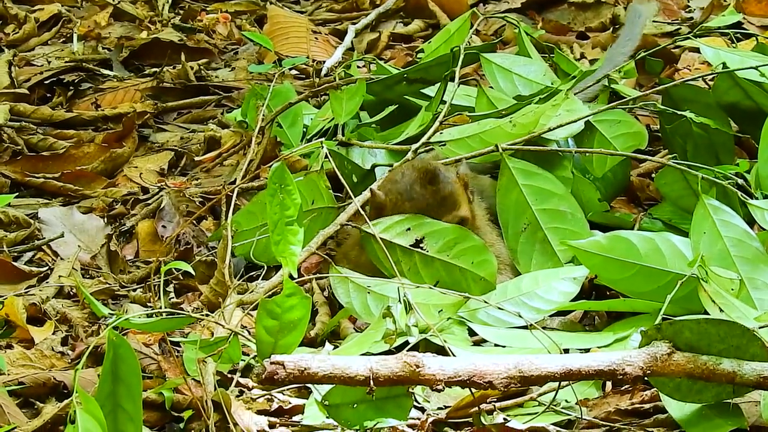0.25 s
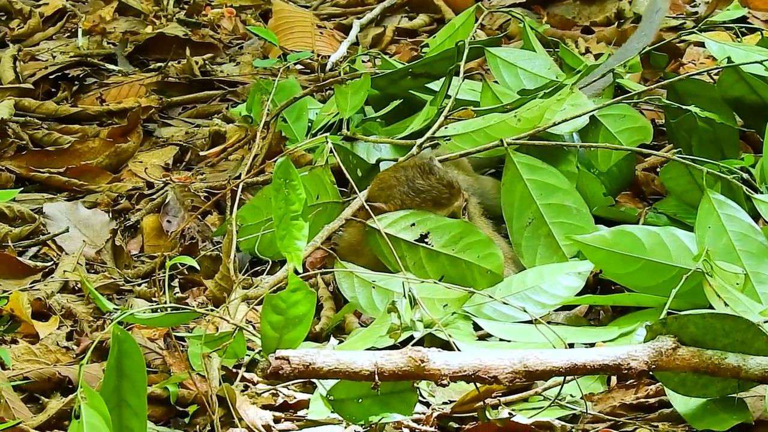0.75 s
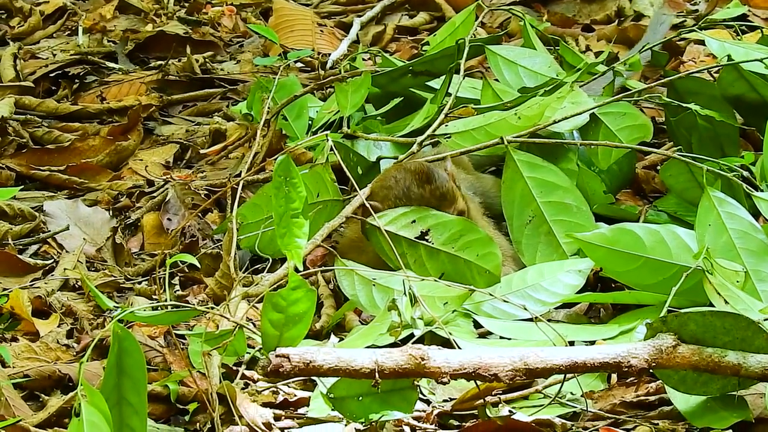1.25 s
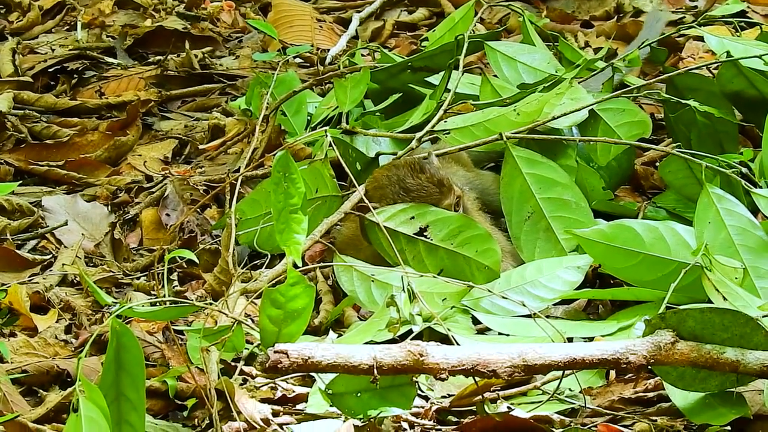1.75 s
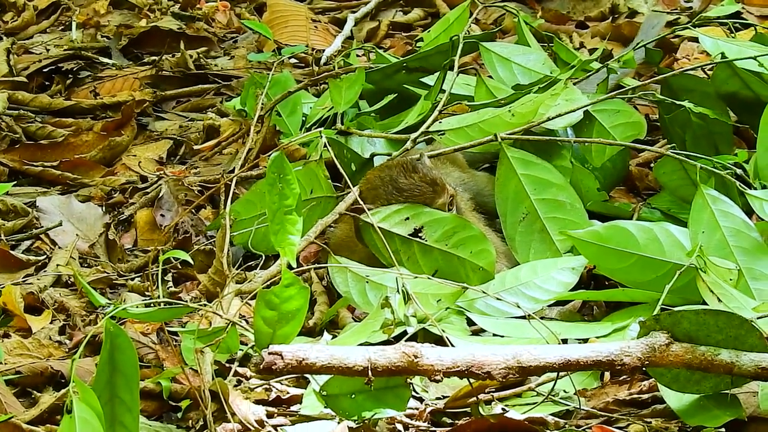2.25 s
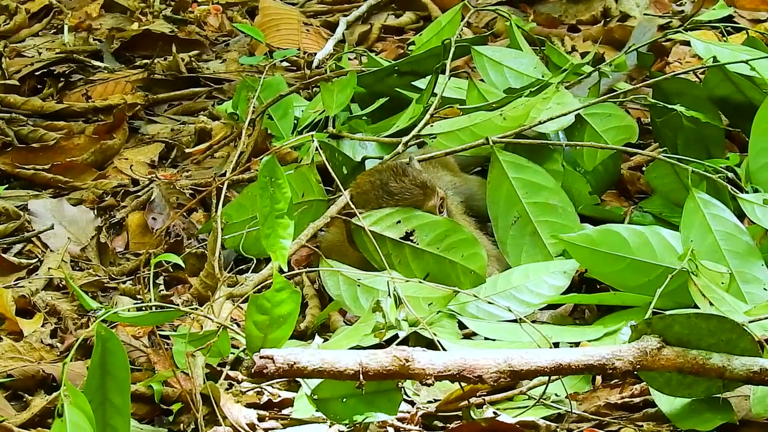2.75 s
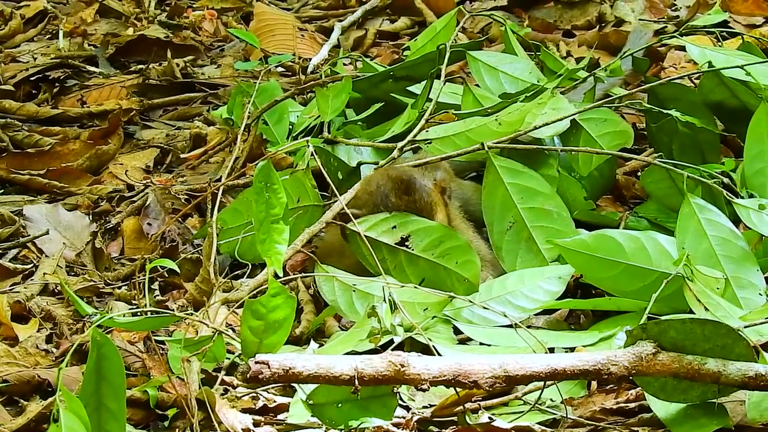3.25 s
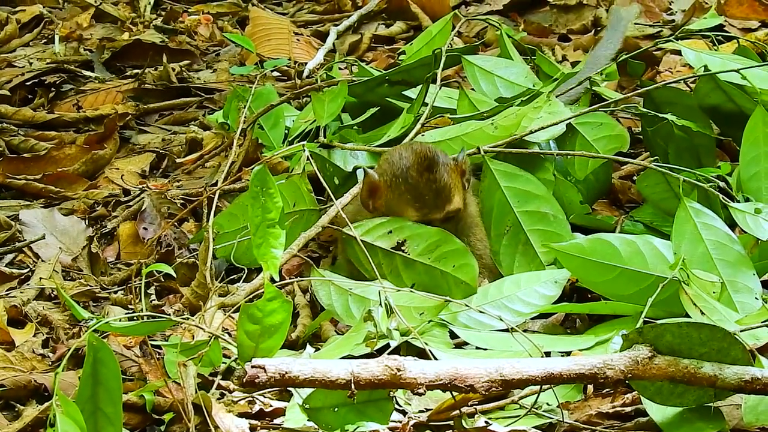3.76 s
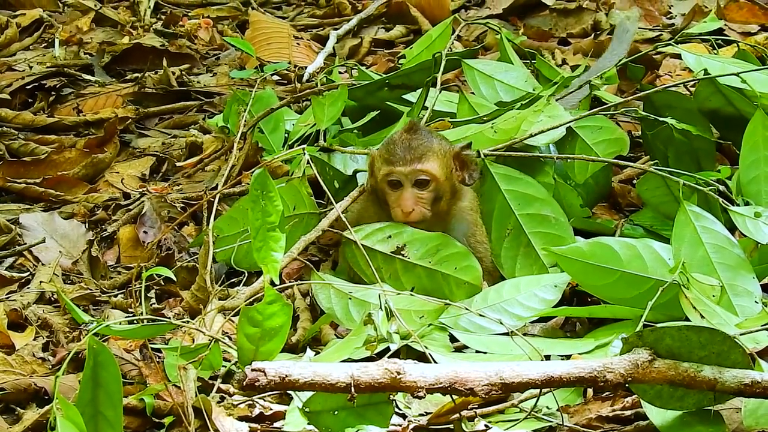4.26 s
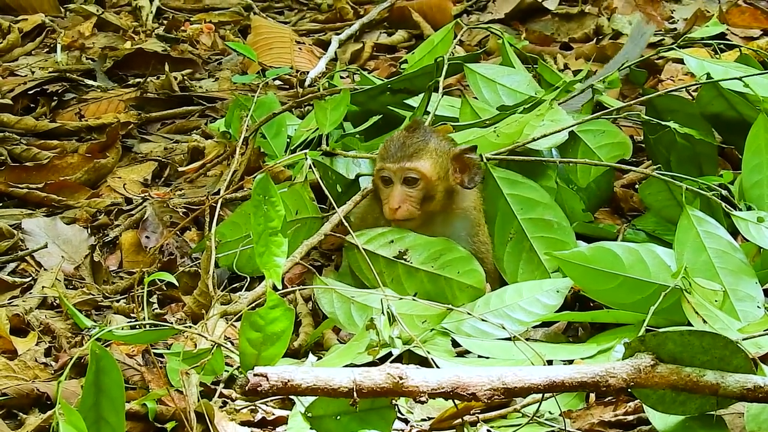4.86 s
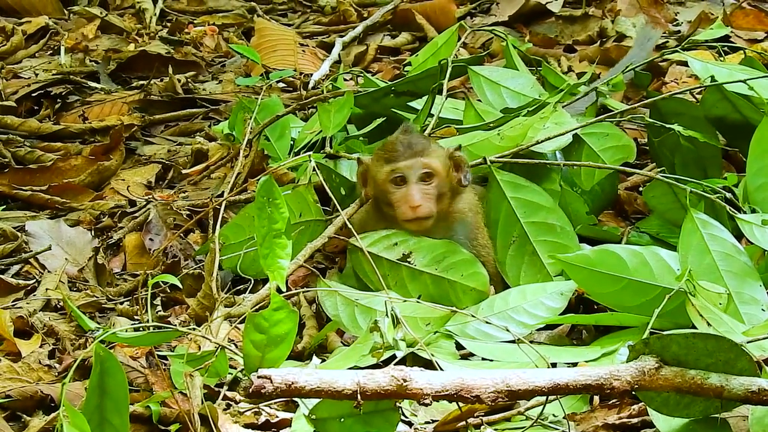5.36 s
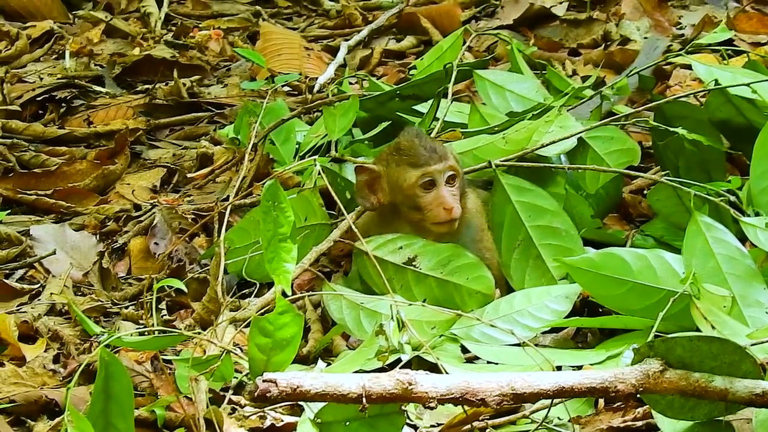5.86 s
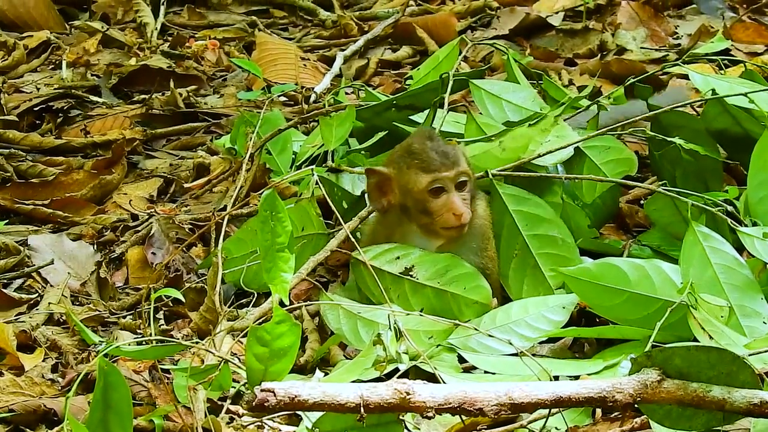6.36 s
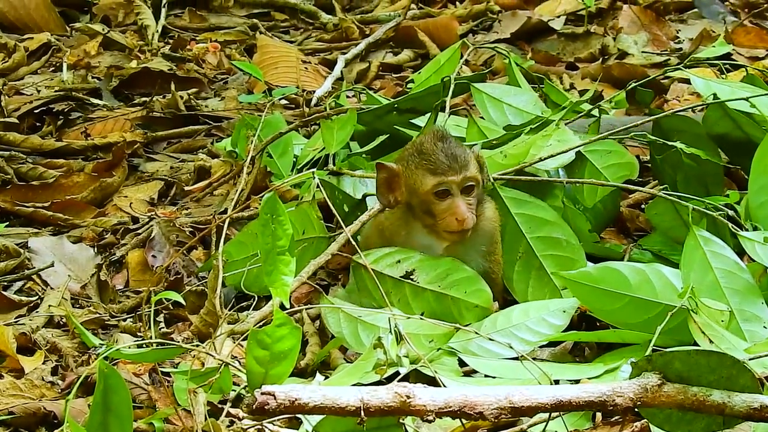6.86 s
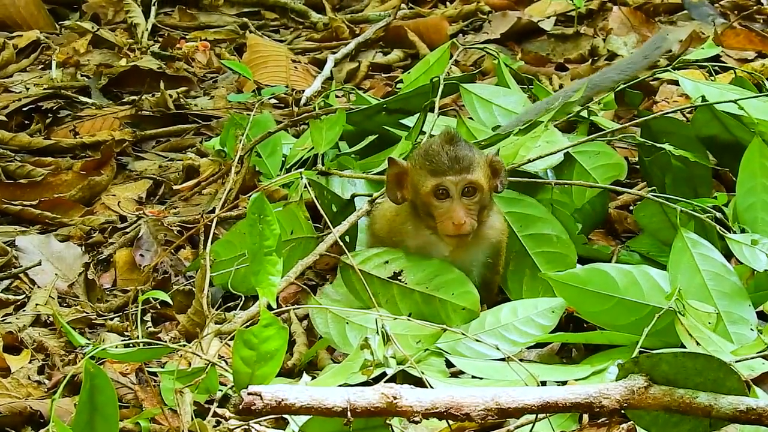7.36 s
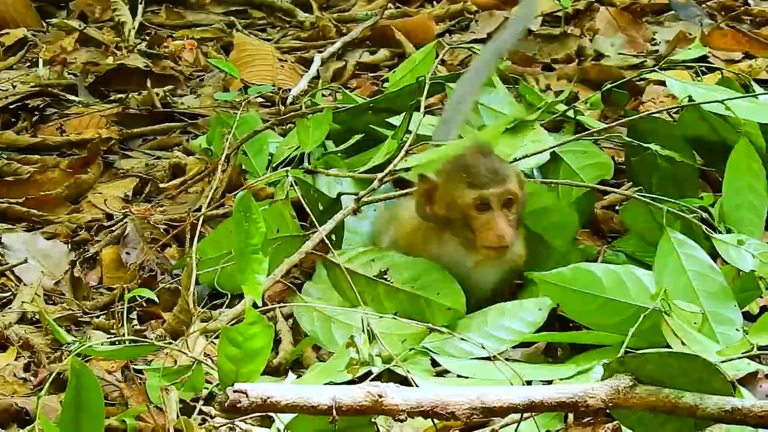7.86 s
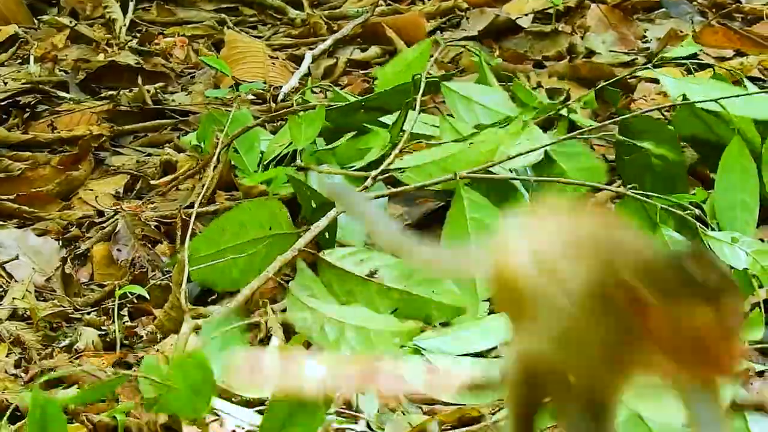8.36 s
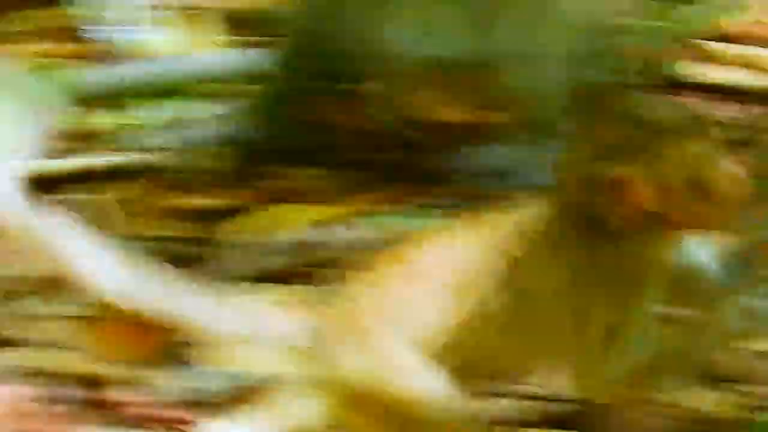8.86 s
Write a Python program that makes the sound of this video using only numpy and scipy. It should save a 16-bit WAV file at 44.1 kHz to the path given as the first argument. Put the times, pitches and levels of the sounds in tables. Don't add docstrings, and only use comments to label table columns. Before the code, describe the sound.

Forest insects whine and pulse above faint engine and traffic rumble, with one loud stick snap late on, followed by busy leaf crunching.

```python
import sys
import numpy as np
from scipy import signal
from scipy.io import wavfile
from scipy.ndimage import uniform_filter1d

SR = 44100
rng = np.random.default_rng(int(sys.argv[2]) if len(sys.argv) > 2 else 0)


def invert_db(x):
    u = np.asarray(x, float) / 20
    return 10 ** u


def digitize_waveform(pressure):
    field = np.atleast_2d(pressure).T
    bounded = np.clip(field, -1, 1)
    quanta = np.round(bounded * 32767).astype(np.int16)
    wavfile.write(sys.argv[1], SR, quanta)


N = 402174

# [t/s, f/Hz, level/dB]
CICADA_NOTE = [(0, 7600, -59.5), (.8, 7520, -61), (1.4, 7510, -62), (2.1, 7656, -63), (2.6, 7674, -62.5),
               (3.2, 7580, -62), (4.2, 7620, -62), (4.8, 7610, -62), (5.4, 7604, -61), (5.9, 7657, -62),
               (6.35, 7684, -61), (6.8, 7660, -62), (7.5, 7695, -63.5), (8, 7750, -61.5), (8.8, 7650, -64),
               (9.12, 7540, -62)]
# [t/s, height/Hz, rise/s]
CICADA_KICKS = [(1.478, 335, .01), (1.81, 325, .01), (2.228, 275, .01), (2.612, 385, .06),
                (4.238, 290, .01), (5.46, 315, .01), (5.85, 275, .01), (6.375, 270, .05), (6.835, 215, .05),
                (7.53, 280, .05), (8.88, 220, .04)]
# [t/s, f/Hz, level/dB]
FAR_CICADA = [(0, 7590, -68), (1, 7500, -77), (2.5, 7480, -72.5), (4.5, 7496, -77), (6, 7470, -76),
              (9.12, 7530, -72)]
VIBRATO_HZ, VIBRATO_DEPTH_HZ = 11.5, 55
COMPANION_DB = -8
SETTLE_S, SETTLE_PER_RISE = .027, 2.3

# [t/s, peak level/dB, body level/dB, crisp f/Hz, body f/Hz]
TWIG_CRACKS = [(.7778, -32, -9, 5540, 2100), (.778, -36, -5, 3600, 1100), (7.1885, -24, -37, 7740, 3800),
               (7.1935, -21, 9, 7400, 3630), (7.1942, -14, -23, 7000, 1540), (7.198, -13, -18, 6800, 1460),
               (7.2031, -18, -17, 5600, 1510), (7.2195, -35, -36, 7560, 3400),
               (7.2347, -14, -47, 6500, 3400), (8.81, -38.5, -14, 5000, 3000), (8.845, -36, 4, 5530, 2350),
               (8.9084, -35.5, -6, 7100, 1010), (8.9128, -35.5, -3, 5230, 1400)]
CRACK_T60_S = 0.017
# [t/s, peak level/dB, t60/s]
LITTER_SETTLING = [
    (0.784, -47.5, .48),
    (7.243, -48, 0.22),
    (7.27, -43.5, 0.1),
]
SETTLING_BODY_DB, SETTLING_HZ, SETTLING_BODY_HZ = -5.5, 5840, 3200
# [t/s, peak level/dB, body level/dB, body f/Hz]
LEAF_TICKS = [(.51, -56, -14, 2500), (1.93, -60, -10, 2500), (2.23, -56, -16, 2500),
              (5.119, -52, -18, 2500), (5.345, -55, 10, 3250), (5.373, -52.5, 13, 2900),
              (5.507, -51, -11, 2500), (5.65, -52, -17, 2500), (6.2037, -48, 0, 3200),
              (6.496, -47, 1, 1510), (6.885, -52, 7, 1500), (7.884, -55, 3, 1840), (8.039, -45.5, -6, 1500),
              (8.161, -49, -6, 1990), (8.35, -50, -4, 3500), (8.3994, -47.5, -5, 2010),
              (8.481, -43.5, -6, 1300), (8.539, -52, 1, 2530), (8.58, -44, 0, 3400), (8.645, -52, -8, 1500),
              (8.6665, -41, -3, 1825), (8.739, -57, 7, 2000), (8.824, -44, 3, 1590), (9.04, -45, 8, 2490),
              (9.072, -46, -8, 2000)]
TICK_HZ, TICK_T60_S = 6500, 0.034
# [t/s, length/s, rms level/dB, body level/dB, crisp f/Hz]
STICK_TEARS = [
    (7.189, 0.018, -28.5, -6.5, 6500),
    (7.214, 0.025, -26.5, -28, 7400),
]
TEAR_BODY_HZ = 3400
# [t/s, length/s, rms level/dB, body level/dB, body f/Hz]
LEAF_CRUSHES = [(2.999, .41, -81, 9, 2980), (3.949, .23, -79, 6.5, 3570), (4.245, .41, -83, 10, 2960),
                (5.858, 0.097, -64, -10.5, 1500), (6.161, 0.033, -64, 7.5, 1930),
                (6.302, 0.12, -76.5, 16, 600), (6.44, .1, -62.5, 0.5, 1080), (7.758, 0.18, -72, 5, 3300),
                (7.778, 0.2, -64.5, -4, 1810), (8.31, 0.083, -59, -19, 1500),
                (8.434, 0.13, -57, -9.5, 1200), (8.564, .15, -73, 1, 3300),
                (8.782, 0.078, -58.5, -11, 1500), (8.994, 0.078, -52, -5.5, 1120),
                (9.027, 0.03, -64.5, 11, 830)]
CRUSH_HZ = 5670
TWIG_S, TWIG_LENGTH_S, TWIG_DB = 6.1775, 0.026, -47.5
# [f/Hz, width/Hz, level/dB]
TWIG_MODES = [(640, 450, -7), (1160, 370, -5), (2010, 290, 0.5), (3200, 380, -3.5), (4450, 620, -6),
              (6300, 2000, 0.5), (8950, 780, -20)]
# [t/s, level/dB]
RUSTLE_LEVEL = [(4.8, -81), (5.5, -71), (6.1, -68), (6.6, -66), (7, -75), (7.4, -66), (7.7, -74),
                (8.3, -62.5), (9.12, -60.5)]

# [t/s, swells so far]
CHORUS_PACE = [(-.07, 0), (1.66, 7), (3.28, 14), (4.27, 18), (5.19, 22), (5.93, 25), (6.47, 27), (9.16, 38)]
# [f/Hz, width/Hz, level/dB]
CHORUS_MODES = [(4520, 600, 8), (4865, 930, 6.5), (5000, 500, -4)]

# [t/s, length/s, first f/Hz, last f/Hz, level/dB]
HUSKY_NOTES = [
    (0, 0.21, 1940, 1880, -70.5),
    (.875, 0.23, 1710, 1750, -66),
    (1.0, 0.12, 2450, 2500, -73),
    (1.071, 0.17, 2250, 2230, -70),
    (1.13, 0.14, 1720, 1860, -67),
    (1.253, 0.33, 1820, 1760, -73.5),
    (7.427, 0.27, 6660, 6860, -67.5),
]
# [t/s, length/s, first f/Hz, last f/Hz, level/dB]
THIN_NOTES = [
    (.857, 0.66, 9130, 8900, -90),
    (1.694, 0.18, 9100, 9100, -88),
    (1.92, 0.097, 9520, 9500, -87),
    (2.05, .2, 9100, 9100, -84),
    (2.16, .08, 8800, 8860, -88),
    (2.3, .14, 8660, 8720, -84),
    (2.644, .12, 6380, 6300, -69),
]
HUSKY_WIDTH_HZ, THIN_WIDTH_HZ = 200, 46
CRICKET_FIRST_S, CRICKET_EVERY_S, CRICKET_BURST_S = .05, .473, .15
CRICKET_HZ, CRICKET_CLIMB_HZ, CRICKET_WIDTH_HZ = 5870, 28, 230
CRICKET_LEVELS = [-68, -68, -74, -74, -75, -75, -72]

# [t/s, firing f/Hz, level/dB]
ENGINE_FIRING = [(0, 42.8, -82), (1.2, 44.12, -66.5), (2.5, 45.6, -66), (4, 47.05, -63), (5.5, 46.54, -62),
                 (7, 46.34, -62.5), (9.12, 45.86, -65.5)]
# [multiple, level/dB]
FIRING_ORDERS = [(1, -7.5), (2, -1), (3, 3.5), (4, 1), (5, -2), (6, -5)]
# [t/s, drone f/Hz, level/dB]
TRUCK_DRONE = [(0, 106.6, -66), (2.5, 115.6, -59.5), (4, 120.3, -60.5), (5.5, 128.7, -63),
               (7, 138.5, -67.5), (9.12, 142.6, -71)]
DRONE_OCTAVE_DB = -8

# [f/Hz, level/dB per Hz]
AIR_SPECTRUM = [(25, -3), (55, -7.5), (126, -2), (223, -10), (437, -26), (791, -24.5), (1150, -30.5),
                (1800, -32), (3400, -40), (6000, -32.5), (8300, -44), (11800, -51.5), (15800, -61.5)]
# [f/Hz, correlation]
AIR_LIKENESS = [(60, 0.95), (150, 0.97), (380, 0.87), (950, 0.83), (2380, 0.64), (5980, 0.041),
                (15000, 0.065)]
RUMBLE_DB, RUMBLE_RISE_DB_PER_S = -1.5, 0.0947
HUSH_DB, HUSH_RISE_DB_PER_S2 = -0.66, 0.08
CROSS_HZ, LAG_S = 4060, 0.01008


def evened(x):
    return x / np.sqrt(np.mean(x ** 2) + 1e-20)


def read(points, hz):
    f, value = np.transpose(points)
    return np.interp(np.log(hz + 1), np.log(f + 1), value)


def curves(rows, t):
    s, *columns = np.transpose(rows)
    return [np.interp(t, s, c) for c in columns]


def add(mix, s, sound):
    part = mix[..., round(s * SR):][..., :sound.shape[-1]]
    part += sound[..., :part.shape[-1]]


def resonate(x, hz, width):
    turn = np.exp(2j * np.pi * np.cumsum(hz * np.ones(x.shape[-1])) / SR)
    r = np.exp(-np.pi * width / SR)
    smooth = signal.lfilter([(1 - r) ** 2], [1, -2 * r, r * r], x / turn + 1e-18)
    return 2 * (turn * smooth).real


def pair(count, same):
    a, b = rng.standard_normal((count, 2)).T
    same = np.clip(same, 0, 1)
    return np.array([a, same * a + np.sqrt(1 - same ** 2) * b])


def forest(x, t60, start_s):
    t = np.arange(SR) / SR
    tail = pair(SR, 0.13) * invert_db(-60 * t / t60) * (t > start_s)
    tail = tail[:, :round(t60 * SR) + 9]
    return signal.oaconvolve(x, tail / np.linalg.norm(tail[0]), axes=-1)[:, :N]


def cicada():
    t = np.arange(N) / SR
    rest_hz, level_db = curves(CICADA_NOTE, t)
    kick_hz = np.zeros(N)
    for s, height, rise in CICADA_KICKS:
        climb = np.clip((t - s) / rise, 0, 1)
        settle_s = SETTLE_S + SETTLE_PER_RISE * rise
        kick_hz += height * climb * np.exp(-np.maximum(t - s - rise, 0) / settle_s)
    drift = evened(uniform_filter1d(rng.standard_normal(N), 6000))
    vibrato = np.sin(2 * np.pi * np.cumsum(VIBRATO_HZ + 1.5 * drift) / SR)
    waver = VIBRATO_DEPTH_HZ * vibrato + 8.0 * drift
    lead_hz = rest_hz + kick_hz + waver * np.exp(-kick_hz / 120)
    lead = np.sin(2 * np.pi * np.cumsum(lead_hz) / SR)
    companion = invert_db(COMPANION_DB) * np.sin(2 * np.pi * np.cumsum(rest_hz - 5 + waver[::-1]) / SR)
    tone = (invert_db(level_db + 1.0) * (lead + companion))[None]
    heard = .25 * tone + forest(tone, 1., .004)
    far_hz, far_db = curves(FAR_CICADA, t)
    return heard + invert_db(far_db) * evened(resonate(pair(N, 0.35), far_hz, 140))


def leafy(x, body_db, crisp_hz, body_hz):
    crisp = evened(resonate(x, crisp_hz, 2370))
    body = invert_db(body_db) * evened(resonate(x, body_hz, 700 + 0.21 * body_hz))
    return signal.lfilter(*signal.butter(2, 10000, fs=SR), crisp + body)


def snaps(out):
    t = np.arange(6000) / SR
    rows = [(s, db, body_db, CRACK_T60_S, *hz) for s, db, body_db, *hz in TWIG_CRACKS]
    rows += [(s, db, SETTLING_BODY_DB, t60, SETTLING_HZ, SETTLING_BODY_HZ) for s, db, t60 in LITTER_SETTLING]
    rows += [(s, db, body_db, TICK_T60_S, TICK_HZ, hz) for s, db, body_db, hz in LEAF_TICKS]
    for s, db, body_db, t60, *hz in rows:
        burst = leafy(rng.standard_normal(6000), body_db, *hz)
        crack = burst * invert_db(-60 * t / max(t60, .003)) * np.minimum(t / 0.00059, 1)
        add(out, s, invert_db(db + 1.5) * crack / abs(crack).max())


def crushes(out):
    rows = [(*row, TEAR_BODY_HZ) for row in STICK_TEARS]
    rows += [(*row, CRUSH_HZ, hz) for *row, hz in LEAF_CRUSHES]
    for s, length, db, body_db, *hz in rows:
        n = round(length * SR)
        noise = rng.random(n) - .5
        strength_db = -3.0 * np.log(np.repeat(rng.random(n // 24 + 1), 24)[:n] + 0.0083)
        swarm = leafy(noise * invert_db(strength_db), body_db, *hz)
        add(out, s, invert_db(db) * swarm * signal.windows.tukey(n, .5))


def rubbed_twig(out):
    rub = rng.standard_normal(round(TWIG_LENGTH_S * SR))
    twig = sum(invert_db(db) * evened(resonate(rub, hz, width)) for hz, width, db in TWIG_MODES)
    twig = signal.lfilter(*signal.butter(4, 9000, fs=SR), twig)
    add(out, TWIG_S, invert_db(TWIG_DB) * twig * signal.windows.tukey(len(rub), .5))


def rustle():
    grain_db = 3.1 * np.minimum(rng.exponential(1, N // 60 + 1), 4)
    grit = pair(N, 0.58) * invert_db(np.repeat(grain_db, 60)[:N])
    colour = leafy(grit, -6.0, 6350, 3380) + invert_db(-15) * evened(resonate(grit, 1420, 1500))
    return invert_db(curves(RUSTLE_LEVEL, np.arange(N) / SR)[0]) * colour


def leaves():
    out = np.zeros(N)
    snaps(out)
    crushes(out)
    rubbed_twig(out)
    near = out + invert_db(-9.0) * forest(out[None], 0.036, .0002)
    return near + invert_db(-25.5) * forest(out[None], 0.49, 0.0042) + rustle()


def chorus():
    ticks = pair(N, 0.55) * invert_db(2.0 * np.minimum(rng.exponential(1, N), 4))
    beat = 2 * np.pi * curves(CHORUS_PACE, np.arange(N) / SR)[0]
    climb = 1 + .022 * np.sin(beat)
    body = sum(invert_db(db) * evened(resonate(ticks, hz * climb, width)) for hz, width, db in CHORUS_MODES)
    uneven = evened(uniform_filter1d(rng.standard_normal(N), 3000))
    swell_db = 2.7 * (np.tanh(1.5 * np.cos(beat + .15)) - 1) + 1.3 * uneven
    return invert_db(-63.5 + swell_db) * evened(body)


def far_calls():
    calls = [(*row, HUSKY_WIDTH_HZ) for row in HUSKY_NOTES]
    calls += [(*row, THIN_WIDTH_HZ) for row in THIN_NOTES]
    for k, db in enumerate(CRICKET_LEVELS):
        s = CRICKET_FIRST_S + k * CRICKET_EVERY_S
        hz = CRICKET_HZ + k * CRICKET_CLIMB_HZ
        calls.append((s, CRICKET_BURST_S, hz, hz, db, CRICKET_WIDTH_HZ))
    out = np.zeros((1, N))
    for s, length, first_hz, last_hz, db, width in calls:
        n = round(length * SR)
        glide_hz = np.linspace(first_hz, last_hz, n)
        whistle = evened(resonate(rng.standard_normal(n), glide_hz, width))[None]
        add(out, s, invert_db(db) * whistle * signal.windows.tukey(n, .5))
    return 0.74 * out + 0.53 * forest(out, 0.89, 0.0099)


def idling_engine():
    push = rng.standard_normal(N)
    hz, level_db = curves(ENGINE_FIRING, np.arange(N) / SR)
    orders = sum(invert_db(db) * evened(resonate(push, k * hz, 2.4)) for k, db in FIRING_ORDERS)
    return invert_db(level_db) * orders


def far_truck():
    push = rng.standard_normal(N)
    hz, level_db = curves(TRUCK_DRONE, np.arange(N) / SR)
    octave = invert_db(DRONE_OCTAVE_DB) * evened(resonate(push, 2 * hz, 9))
    return invert_db(level_db) * (evened(resonate(push, hz, 3.2)) + octave)


def air():
    frames, hz = N // 512 + 5, np.fft.rfftfreq(2048, 1 / SR)
    a, b, c, d, patches = rng.standard_normal((frames, 1025, 5)).T
    patches = evened(uniform_filter1d(uniform_filter1d(patches, 14, 0), 8, 1))
    t = np.arange(frames) * 512 / SR
    rumble_db = RUMBLE_DB + RUMBLE_RISE_DB_PER_S * t
    hush_db = HUSH_DB + HUSH_RISE_DB_PER_S2 * t ** 2
    low = (1 / (1 + (hz / 380) ** 4))[:, None]
    high = (1 / (1 + (hz / 3500) ** 4))[:, None]
    swell_db = low * rumble_db + (1 - low) * high * hush_db
    same = np.clip(read(AIR_LIKENESS, hz), -1, 1)[:, None]
    left = a + 1j * b
    right = same * left + np.sqrt(1 - same ** 2) * (c + 1j * d)
    level_db = read(AIR_SPECTRUM, hz)[:, None] + 1.47 * patches + swell_db
    z = np.array([left, right]) * invert_db(level_db)
    return invert_db(-50.5) * evened(signal.istft(z, nperseg=2048, noverlap=1536)[1][:, :N])


def scene():
    return cicada() + leaves() + chorus() + far_calls() + idling_engine() + far_truck() + air()


def gate(x, strength):
    z = signal.stft(x, nperseg=2048, noverlap=1536)[2]
    around = uniform_filter1d(abs(z), size=15, axis=1) + 1e-12
    gain = 0.95 * np.clip(abs(z) / around, .05, 2.5) ** strength
    return signal.istft(z * gain, nperseg=2048, noverlap=1536)[1][:, :N]


def low_pass(x):
    return signal.sosfilt(signal.butter(12, 15980, fs=SR, output="sos"), x)


def record(dry):
    clean = gate(dry, strength=0.3)
    clean = signal.sosfilt(signal.butter(6, 44, "high", fs=SR, output="sos"), clean)
    low = signal.oaconvolve(clean, signal.firwin(255, CROSS_HZ, fs=SR)[None], "same", axes=1)
    joined = clean - low + np.roll(low, -round(LAG_S * SR), axis=1)
    balance_db = [[.25], [-.25]]
    return low_pass(joined * invert_db(balance_db))


dry = scene()
out = record(dry)
digitize_waveform(out)
```